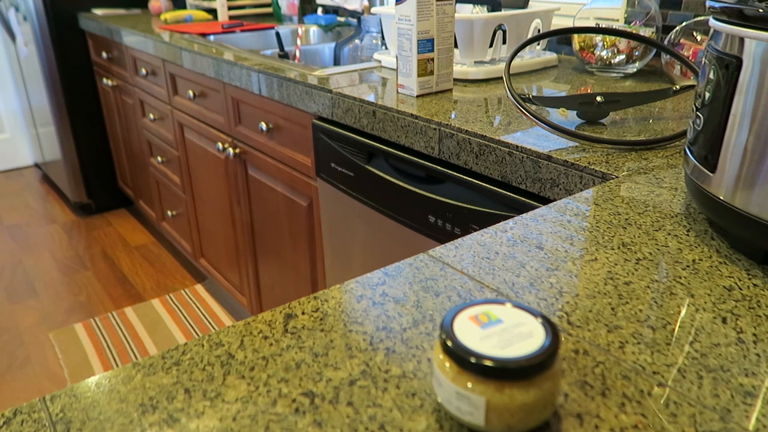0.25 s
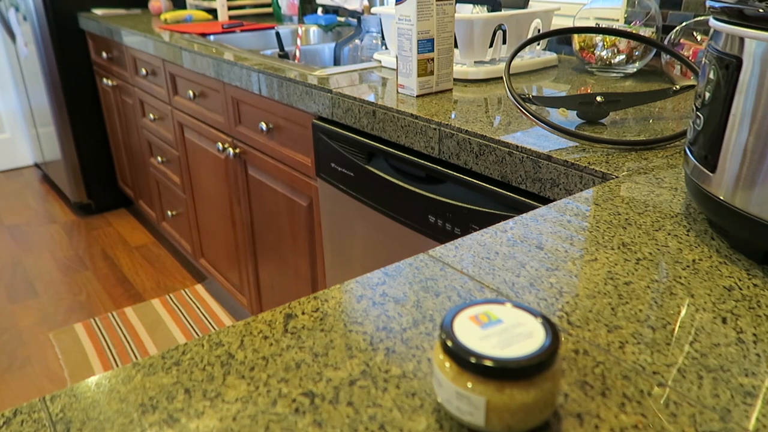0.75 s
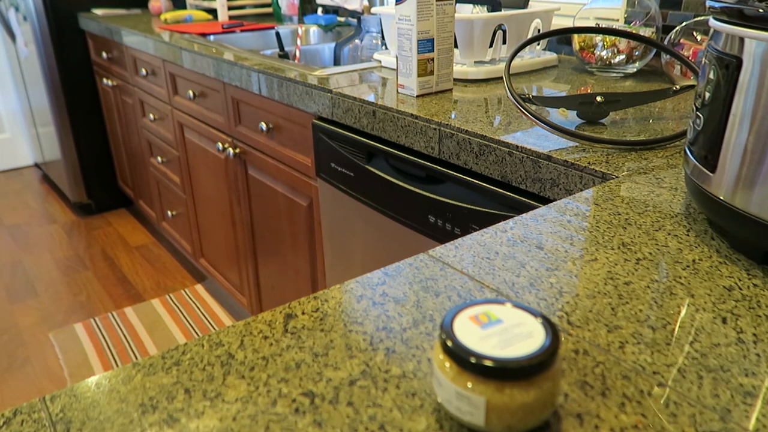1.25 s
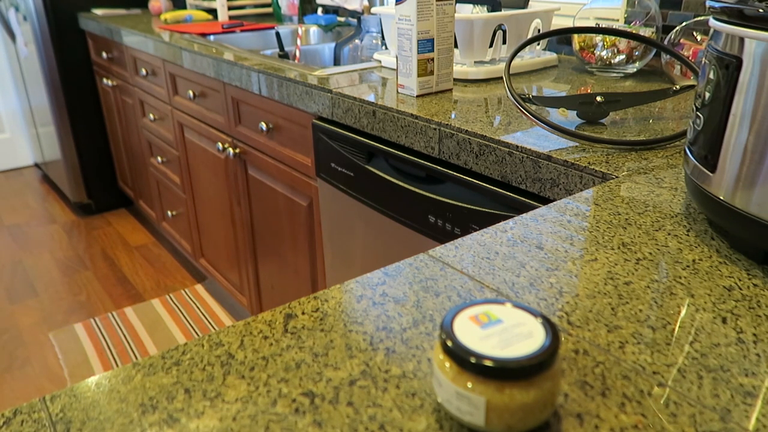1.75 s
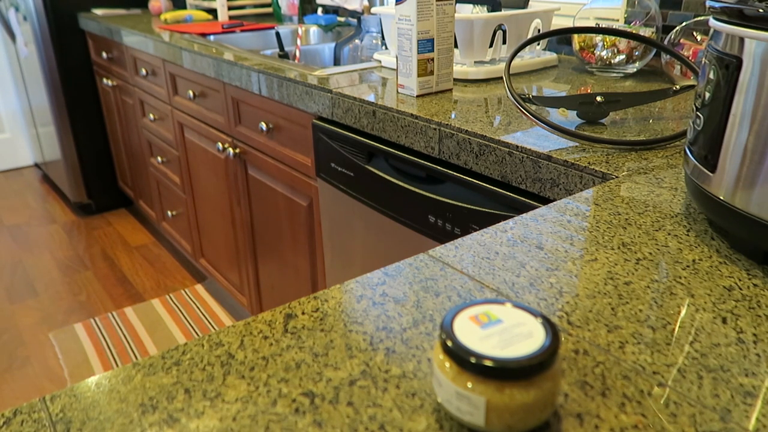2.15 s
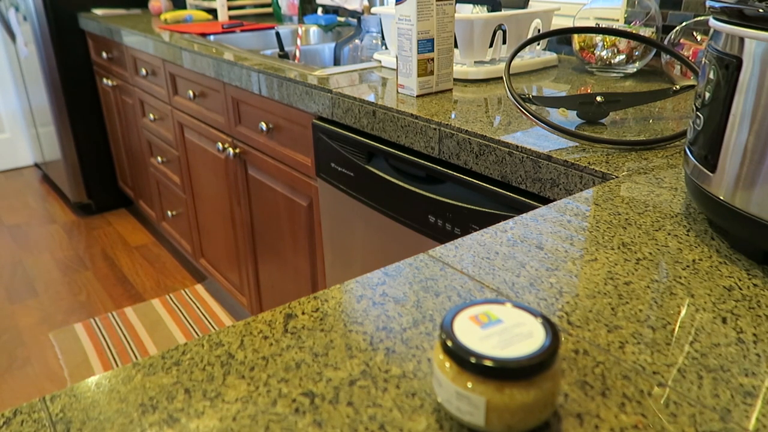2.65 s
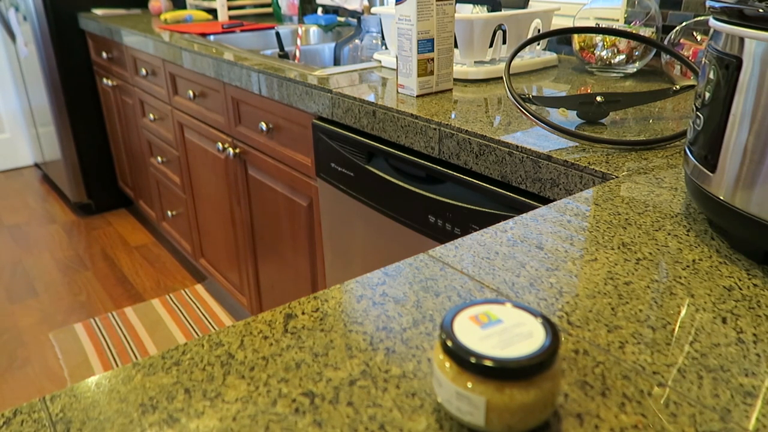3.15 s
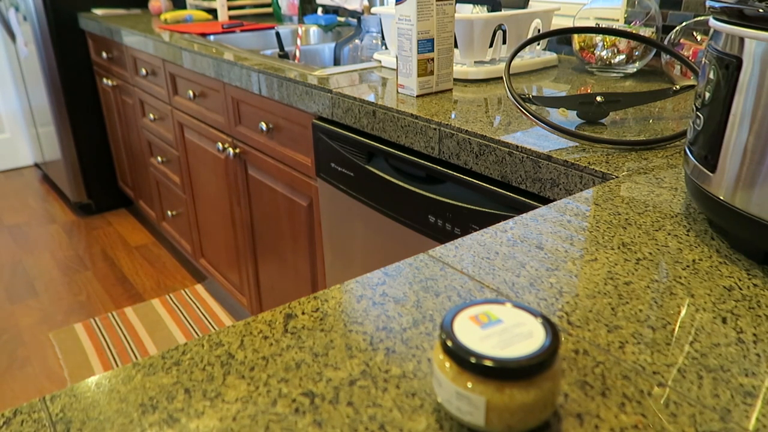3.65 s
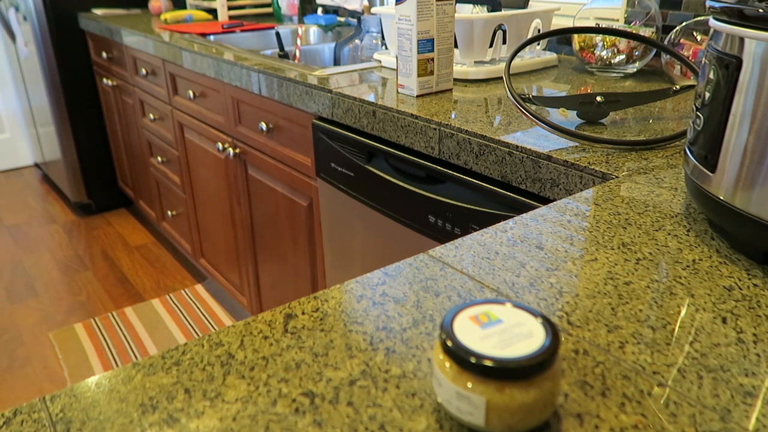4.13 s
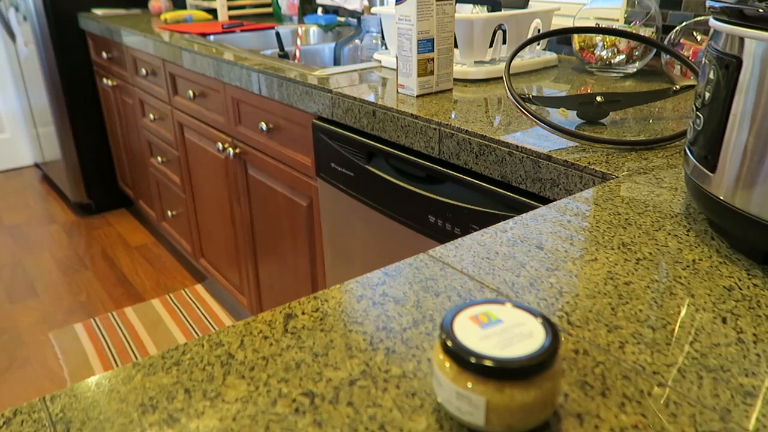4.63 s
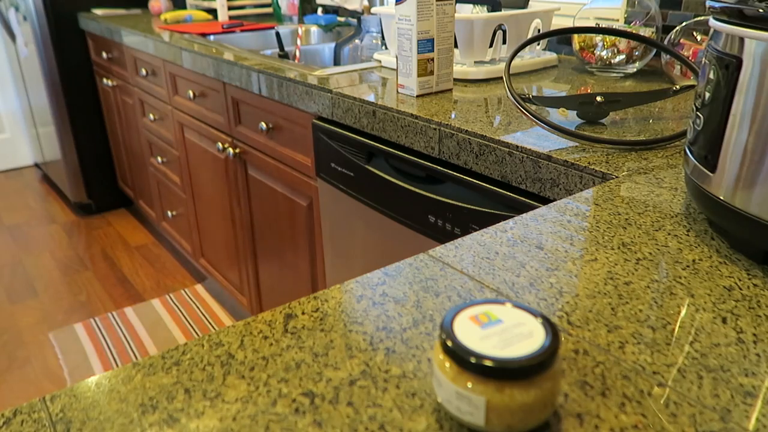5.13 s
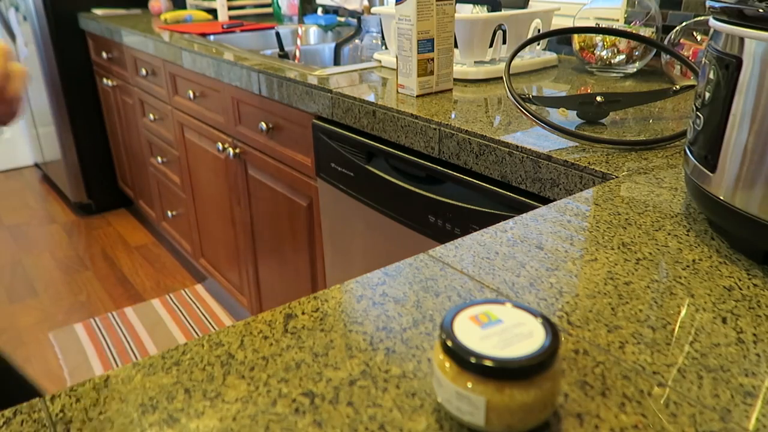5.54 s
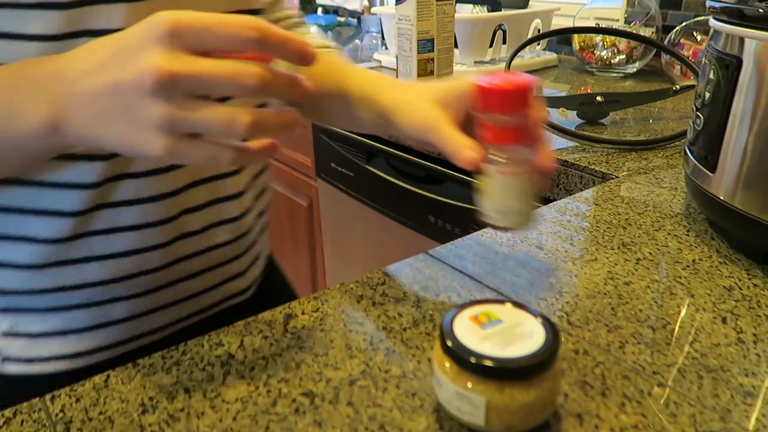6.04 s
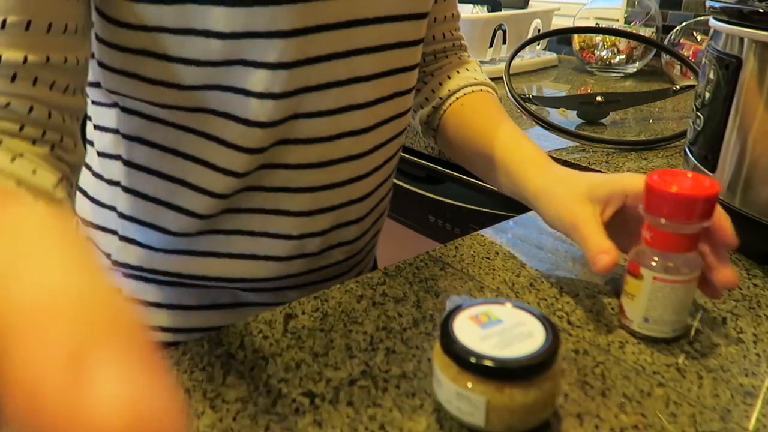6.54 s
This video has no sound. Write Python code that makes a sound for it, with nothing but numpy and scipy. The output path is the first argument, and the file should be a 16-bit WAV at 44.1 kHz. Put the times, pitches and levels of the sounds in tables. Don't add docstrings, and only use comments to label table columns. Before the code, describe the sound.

A small camera microphone on a stone counter picks up steady room tone and fridge hum. Three cupboard door knocks land about two seconds or less apart, with a weaker rebound after the second, each briefly exciting the live room. Light clinks, scrapes, grainy spice shakes and lens ticks fill the gaps; low heel steps approach and a glass jar is put down nearby with a bright, hard double tap.

```python
import sys
import numpy as np
from scipy import signal
from scipy.fft import rfft, irfft, next_fast_len
from scipy.io import wavfile

SR = 44100
rng = np.random.default_rng(int(sys.argv[2]) if len(sys.argv) > 2 else 0)


def output_pcm(signal):
    pcm = np.clip(np.atleast_2d(signal).T, -1, 1) * 32767
    wavfile.write(sys.argv[1], SR, np.round(pcm).astype(np.int16))


def ratio(d):
    e = np.asarray(d, float) / 20
    return 10 ** e


N = 299306

# f/Hz, level/(dB per Hz)
AIR_MID = [(12, -31), (20, -14), (49, -1), (90, -7.5), (171, -2.5), (266, -6.5), (298, -10), (382, -8.5),
           (416, -10.5), (686, -12), (881, -19), (1540, -21.5), (2610, -29), (11100, -49), (15500, -63)]
AIR_SIDE = [(12, -57.5), (20, -33), (196, -5.5), (352, -3), (382, -4.5), (439, -2.5), (549, -12),
            (857, -13.5), (12100, -42.5), (14300, -56.5), (15500, -55)]
# f/Hz, level/dB, width/Hz
FRIDGE_HUM = [(121, -55, 18), (178.3, -53.5, 2.5), (293.2, -58, 1.9), (467.2, -61.5, 3.7)]
# f/Hz, level/dB, t/s
MOTOR_WHINE = (356, -51, 5.9)
# f/Hz, t60/s, side minus mid level/dB
ROOM = [(60, 0.79, -44), (126, 0.44, -47.5), (250, 0.71, -23.5), (500, 0.68, -12.5), (1000, 0.84, -19),
        (2000, 0.67, -17.5), (4070, 0.78, -10), (8000, 0.92, -0.5), (14000, 0.24, 5)]
# t/s, peak level/dB
STEPS = [(.578, -37), (4.512, -23), (4.562, -31), (4.638, -32), (5.244, -18.5), (5.287, -21), (5.383, -33),
         (5.469, -41), (5.962, -25)]
# t/s, peak level/dB
LOW_TAPS = [(.003, -27), (1.475, -36), (1.78, -33.5), (2.44, -29.5), (2.66, -29), (2.776, -39), (3.26, -42),
            (3.502, -27), (3.591, -34)]
HIGH_TAPS = [(.012, -31), (1.77, -35.5), (2.42, -33), (2.565, -34), (2.637, -30), (2.771, -30),
             (2.789, -18), (3.239, -36), (3.488, -35.5), (5.253, -33)]
# t/s, peak level/dB, f/Hz, t60/s
BUMPS = [
    (.005, -35, 95, 0.29),
    (.547, -30, 140, 0.12),
    (3.989, -36, 240, 0.12),
    (4.021, -27.5, 156, 0.071),
    (4.2, -41, 28, 0.79),
]
# t/s, level/dB, length/s
SHAKES = [(0.179, -62, 0.048), (.368, -66, .035), (2.69, -52.5, 0.046), (3.236, -65, .04),
          (3.729, -55.5, 0.14), (3.82, -62, 0.08), (4.132, -59, 0.055), (4.266, -58.5, 0.066),
          (5.246, -59, 0.047), (5.496, -62, 0.13), (6.499, -43.5, 0.036), (6.52, -64, 0.043)]
# f/Hz, level/(dB per Hz)
SPICE_SPECTRUM = [(2940, -28), (5000, -5.5), (6280, -4.5), (8140, -14.5), (12300, -9.5), (14700, -19),
                  (15500, -24)]
# t/s, peak level/dB, f/Hz, scrape level/dB
CLINKS = [(.002, -34.5, 794, -52), (1.52, -40.5, 1000, -46), (1.54, -38, 1684, -54),
          (1.601, -55, 2270, -62), (1.674, -36, 1017, -54.5), (1.74, -45, 1150, -65),
          (2.259, -56, 2800, -61), (2.431, -41.5, 1200, -60), (2.44, -41, 1670, -66),
          (2.486, -43, 1225, -68), (2.53, -47, 1220, -65), (3.23, -58, 1500, -49), (3.34, -42, 1240, -57),
          (4.578, -66, 1620, -55.5), (4.634, -61, 1590, -56), (4.74, -53, 1550, -62),
          (4.839, -48, 2000, -61), (4.92, -58, 1690, -67), (5.25, -46.5, 1800, -47)]
# t/s, peak level/dB, f/Hz
TICKS = [(3.486, -37, 800), (5.25, -44, 5230), (5.263, -43, 4600), (5.255, -37, 2720), (5.5, -54, 6400),
         (5.574, -49.5, 6900), (5.778, -43, 2160), (5.963, -35, 765), (6.061, -42, 2420),
         (6.061, -44, 5880), (6.062, -43, 1500), (6.075, -46, 2800), (6.119, -44, 900),
         (6.406, -46.5, 4700), (6.687, -51, 5000), (6.695, -49, 5300), (6.695, -51, 2720),
         (6.759, -30.5, 2210), (6.76, -31, 790)]
# t/s, peak level/dB
LENS_TICKS = [(0.072, -48.5), (.375, -50), (.44, -56), (.48, -56), (.508, -50), (.58, -56), (.605, -55),
              (.68, -55), (.707, -52), (.737, -53), (6.25, -52), (6.06, -50), (6.28, -53), (6.298, -54),
              (6.365, -55), (6.346, -50), (6.78, -54)]
# t/s, force level/dB, clatter level/dB
FIRST_HITS = [(.1795, -9.5, -38.5), (.1865, -24.5, -33.5), (.2035, -9.5, -33.5)]
SECOND_HITS = [(2.688, 0, -24), (2.715, -28, -37)]
REBOUND_HITS = [(2.966, -16.5, -35), (2.974, -33, -45.5), (2.99, -23.5, -36)]
THIRD_HITS = [(4.154, 2.5, -32.5), (4.161, -26, -24.5), (4.183, -17, -44), (4.23, -33, -42)]
JAR_HITS = [(6.4725, -46, -39), (6.4795, -14.5, -14.5), (6.485, -16.5, -11.5), (6.5145, -21, -30.5)]
# f/Hz, level/(dB per Hz)
#   panel swell/ms, clatter decay/ms, room share of panel/dB and of clatter/dB, left lag/samples
FIRST_DOOR = (FIRST_HITS, [(60, -17, .15), (108, -9, 0.45), (143, 3, 0.12), (179, -6, 0.07),
              (264.6, -19, 0.37), (388, -14, 0.066), (730, -14.5, 0.031)], [(400, 6.5), (700, 12),
              (1000, 1.5), (2000, -3), (4600, -14), (5200, -20.5), (12000, -45), (15000, -56)],
              4.4, 8.2, -22, -9.5, .1)
SECOND_DOOR = (SECOND_HITS, [(140, -21, 0.11), (189.3, 3.5, 0.073), (192, -10, 0.24), (273.5, -9.5, 0.15),
               (378.5, 9, 0.044), (425, -28, 0.26), (712, -8, 0.044), (1207, -8, 0.026),
               (1500, -21, 0.043)], [(400, 7), (700, -3.5), (1100, 0.5), (1700, -4.5), (2100, -5.5),
               (3000, -7.5), (3600, -15.5), (5000, -24), (8000, -37), (9500, -61), (14500, -69)],
               7.1, 9.95, -23.5, -5.5, -.2)
DOOR_REBOUND = (REBOUND_HITS, [(117, -7.5, 0.05), (180, -3, 0.08), (282, -2, 0.065), (395, 0.5, 0.058),
                (825, -14, 0.21), (1500, -31, 0.038)], [(400, -11), (790, 5), (1100, -5), (2000, -8.5),
                (3700, -21), (4200, -29), (9000, -61)], 2.7, 7.6, -16.5, -2.1, .1)
THIRD_DOOR = (THIRD_HITS, [(64.7, -20, 0.36), (94, -15.5, 0.18), (142, 7.5, 0.034), (170.3, -8.5, 0.12),
              (197, -20, 0.25), (261.4, -5, 0.047), (371, -12, 0.058), (489, -23.5, 0.16),
              (753, -14.5, 0.038)], [(400, 3), (650, 0.5), (1000, -7), (2100, -6.5), (3400, -16),
              (3900, -33), (4800, -31), (5500, -40.5), (12000, -66), (15000, -62)],
              6.4, 9.74, -19.5, -9, -.1)
SPICE_JAR = (JAR_HITS, [(191, -3.5, 0.038), (114, -12, 0.2), (330, -10, 0.034), (718, -19, 0.064),
             (1106, -1.5, 0.062), (1112, -26.5, 0.51), (1420, -19.5, 0.11), (1700, -14, 0.066),
             (1920, 1.5, 0.026), (1910, -25, 0.3), (2485, -15, 0.12), (2714, -21, .2), (2800, -22, .25),
             (2900, -9.5, 0.16), (2897, -20, 0.39), (3005, -22, 0.62), (3050, -18, 0.16),
             (3720, -42, 0.044), (5480, -25, 0.026), (6200, -26, 0.023), (7660, -25, 0.025)], [(400, 2),
             (1000, -2), (2000, -5.5), (3000, -1), (4000, -16.5), (8000, -35), (12000, -36), (15300, -25.5),
             (16000, -76)], 0.38, 1.9, -30, -20, 1.42)


def colour(x, points):
    hz, db = np.transpose(points)
    size = next_fast_len(x.shape[-1], real=True)
    log_f = np.log(np.arange(size // 2 + 1) * SR / size + 1)
    gain = ratio(np.interp(log_f, np.log(hz), db, left=-90, right=-90))
    y = irfft(rfft(x, size) * gain, size)[..., :x.shape[-1]]
    return y / np.sqrt(np.mean(y ** 2))


def ring(hz, t60, size):
    t = np.arange(size) / SR
    return np.sin(2 * np.pi * hz * t) * ratio(-60 * t / max(t60, .004))


def add(out, x, s):
    i = round(s * SR)
    x, i = x[..., max(-i, 0):], max(i, 0)
    out[..., i:i + x.shape[-1]] += x[..., :N - i]


def stereo(mid, side):
    return np.array([mid + side, mid - side])


def room(send, size=2 ** 15):
    t = np.arange(size) / SR
    log_f = np.log(np.arange(size // 2 + 1) * SR / size + 1)
    centres = np.log(np.array(ROOM)[:, 0])
    noise = rfft(rng.standard_normal((2, size)))
    tail = 0
    for k, (hz, t60, side_db) in enumerate(ROOM):
        share = np.interp(log_f, centres, np.arange(len(ROOM)) == k)
        mid, side = irfft(noise * share) * ratio(-60 * t / t60)
        tail = tail + stereo(mid, ratio(side_db) * side)
    build_up = 1 - np.exp(-t / 0.0034)
    near = 1 + 0.65 * np.exp(-t / 0.015)
    return signal.fftconvolve(send[None], .08 * tail * build_up * near, axes=1)[:, :N]


def two_ports(direct, lag):
    taps = np.arange(-16, 17)
    left = np.convolve(direct, np.sinc(taps - lag) * np.hanning(len(taps)), "same")
    return np.array([left, direct])


def burst(points, decay_ms, size=8192):
    t = (np.arange(size) - size // 4) / SR * 1000 / decay_ms
    half_decay = decay_ms * SR / 2000
    rattle = rng.standard_normal(size) * np.exp(-np.abs(t)) * np.clip(6 * t, 0, 1)
    rattle = colour(rattle, points)
    impulse = 1. * (np.arange(size) == size // 4 + round(half_decay))
    push = .9 * colour(impulse, points) + .45 * rattle
    return np.array([rattle, push]) * np.sqrt(half_decay / size)


def room_tone():
    mid = colour(rng.standard_normal(N), AIR_MID)
    side = colour(rng.standard_normal(N), AIR_SIDE)
    wander = colour(rng.standard_normal(N), [(1.2, 60), (3, -54.5), (12, -8)])
    return stereo(ratio(-47 + 0.35 * wander) * mid, ratio(-50) * side)


def fridge():
    hum = np.zeros(N)
    for hz, db, width in FRIDGE_HUM:
        line = [(hz - 3 * width, -25), (hz, 0), (hz + 3 * width, -25)]
        hum += ratio(db) * colour(rng.standard_normal(N), line)
    t = np.arange(N) / SR
    hz, db, start = MOTOR_WHINE
    hum += ratio(db) * np.sin(2 * np.pi * hz * t) * np.clip((t - start) / 0.23, 0, 1)
    return stereo(hum, 0)


def thumps():
    pushes = list(BUMPS)
    for rows, hz, t60 in ((STEPS, 44, .17), (LOW_TAPS, 189.2, 0.11), (HIGH_TAPS, 401.7, 0.063)):
        pushes += [(*row, hz, t60) for row in rows]
    out = np.zeros(N)
    t = np.arange(16384) / SR
    for s, peak_db, hz, t60 in pushes:
        swell = 1 - np.exp(-t * hz / 0.29)
        add(out, -ratio(peak_db) * ring(hz, t60, len(t)) * swell, s)
    return two_ports(out, 0) + room(ratio(-23) * out)


def spice():
    out = np.zeros((2, N))
    for s, db, length in SHAKES:
        t = np.arange(16384) / SR / length
        grains = rng.standard_normal((2, 16384)) * ratio(1.8 * rng.exponential(size=16384))
        grains = colour(grains + 0.19 * grains[::-1], SPICE_SPECTRUM)
        rush = 8 * t * np.exp(-2.5 * t) / (1 + 4 * t)
        add(out, ratio(db) * grains * rush, s)
    return out


def near_ticks():
    out = np.zeros(N)
    ticks = [(*row, 0.0094) for row in TICKS]
    ticks += [(*row, 4190, 0.016) for row in LENS_TICKS]
    for s, peak_db, hz, t60 in ticks:
        pair = ring(hz, t60, 2048) - 0.56 * ring(1.145 * hz, t60, 2048)
        add(out, ratio(peak_db) * pair, s)
    return two_ports(out, 0.6)


def clinks():
    rings, scrapes = np.zeros(N), np.zeros((2, N))
    t60 = 0.044
    spectrum = [(600, -16), (1700, 0), (3430, -8), (1.42 * 3430, -23), (9000, -38), (15000, -52)]
    for s, peak_db, hz, scrape_db in CLINKS:
        pair = ring(hz, t60, 4096) - 0.12 * ring(1.2 * hz, t60, 4096)
        add(rings, ratio(peak_db) * pair, s)
        add(scrapes, ratio(scrape_db) * burst(spectrum, 5.06), s - 2048 / SR)
    send = ratio(0.5) * scrapes[1] + ratio(-13.5) * rings
    return two_ports(rings + scrapes[0], 0.6) + room(send)


def knocks(thing):
    contacts, modes, clatter, swell_ms, decay_ms, body_room_db, clatter_room_db, lag = thing
    body, rattle = np.zeros(N), np.zeros((2, N))
    t = np.arange(16384) / SR
    swing = np.zeros(len(t))
    for k, (hz, db, t60) in enumerate(modes):
        swing -= (-1) ** k * ratio(db) * ring(hz, t60, len(t))
    swing *= 1 - np.exp(-(t * 1000 / swell_ms) ** 2)
    for s, force_db, clatter_db in contacts:
        add(body, ratio(force_db) * swing, s)
        add(rattle, ratio(clatter_db) * burst(clatter, decay_ms), s - 2048 / SR)
    send = ratio(body_room_db) * body + ratio(clatter_room_db) * rattle[1]
    return two_ports(body + rattle[0], lag) + room(send)


def scene():
    background = room_tone() + fridge()
    touches = thumps() + spice() + near_ticks() + clinks()
    struck = (FIRST_DOOR, SECOND_DOOR, DOOR_REBOUND, THIRD_DOOR, SPICE_JAR)
    return background + touches + sum(knocks(thing) for thing in struck)


def top_cut(x):
    return signal.sosfilt(signal.butter(12, 15700, fs=SR, output="sos"), x)


def record(dry):
    mix = dry * ratio(np.array([[-.2], [.2]]))
    mix = np.tanh(.4 * mix) / .4
    return top_cut(mix)


dry = scene()
out = record(dry)
output_pcm(out)
```